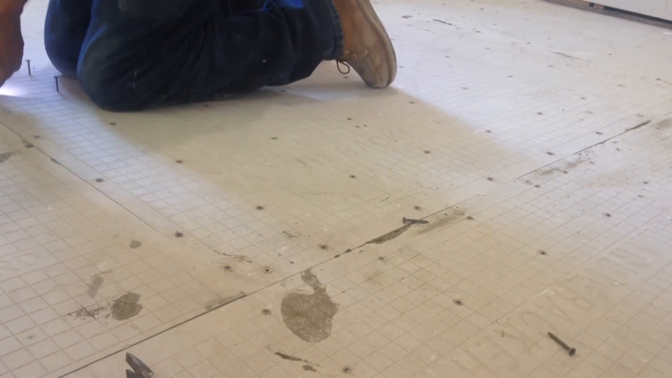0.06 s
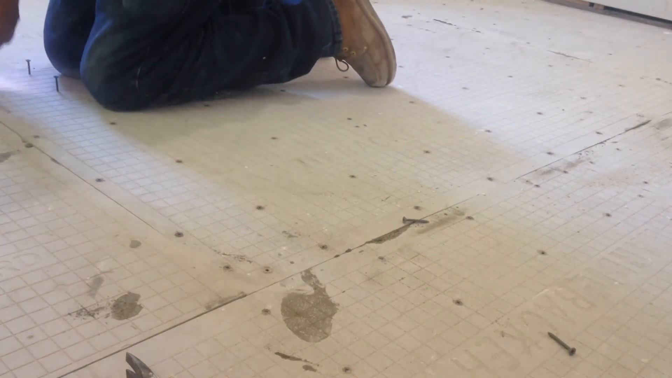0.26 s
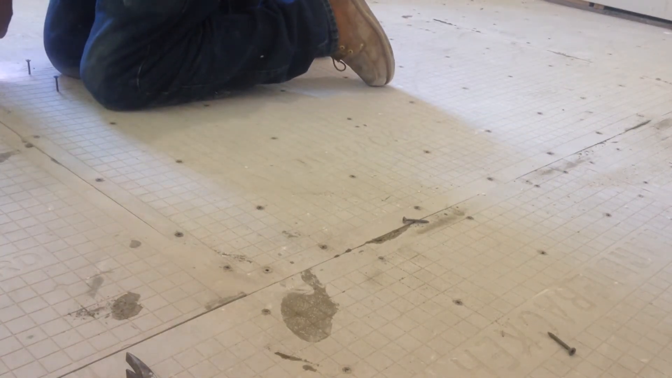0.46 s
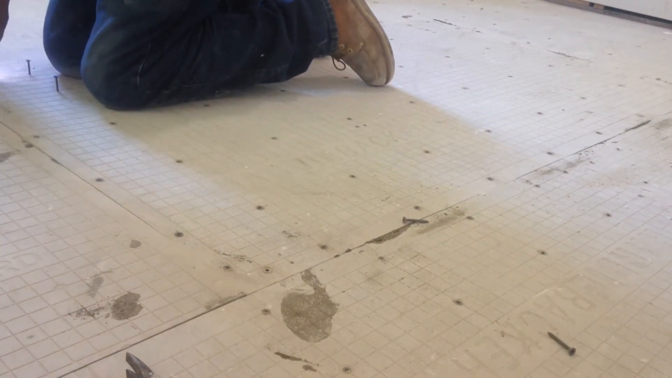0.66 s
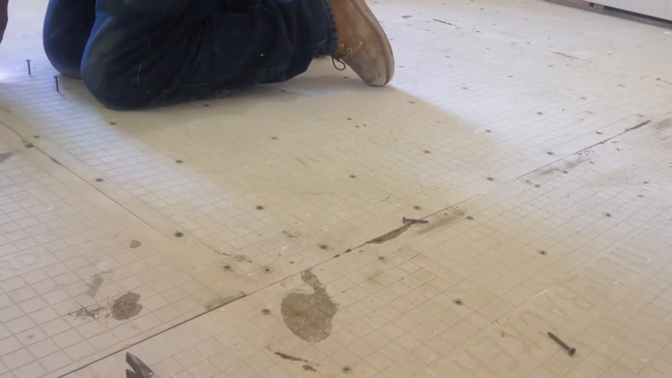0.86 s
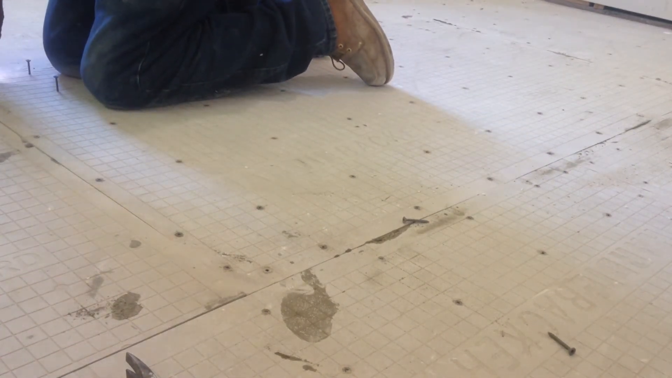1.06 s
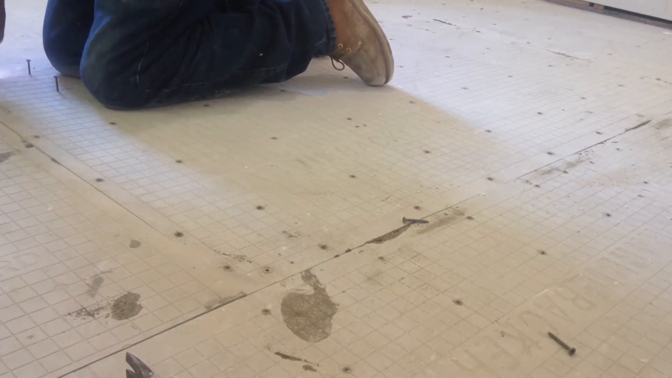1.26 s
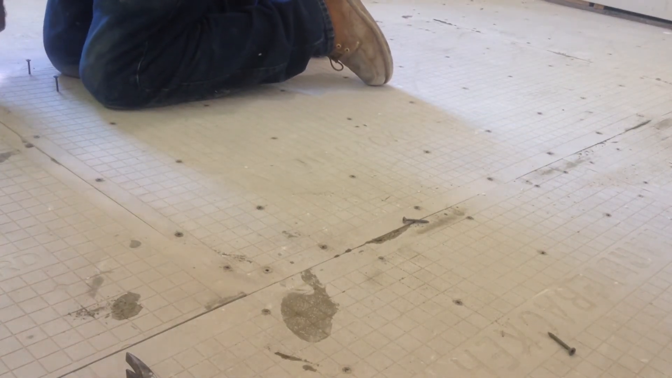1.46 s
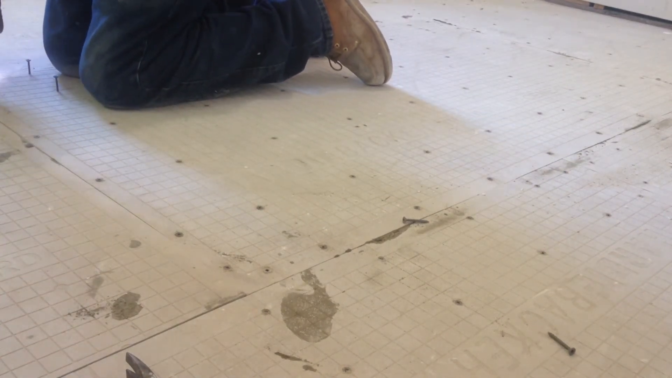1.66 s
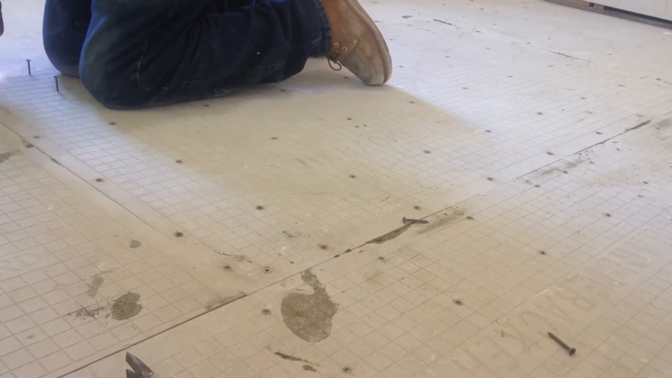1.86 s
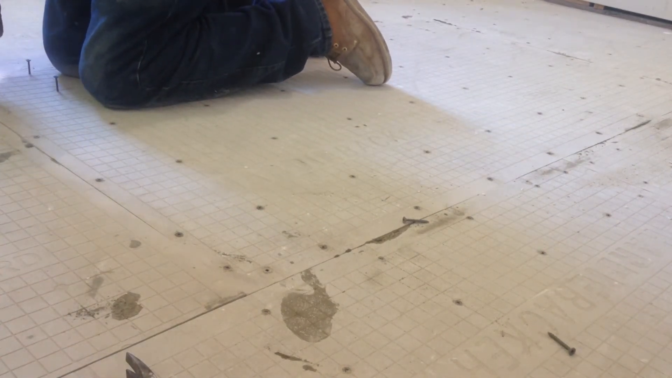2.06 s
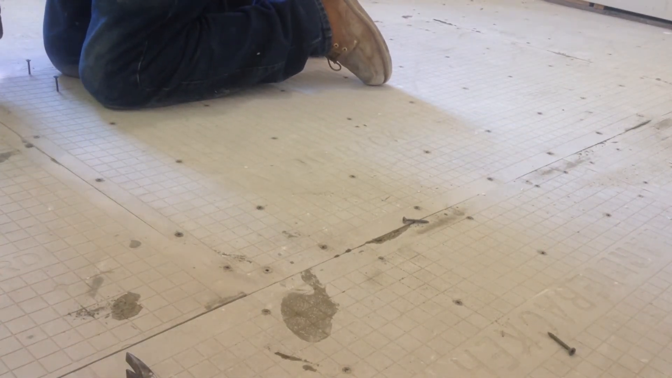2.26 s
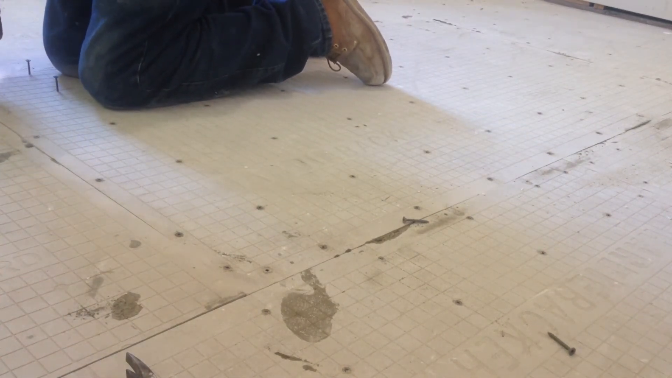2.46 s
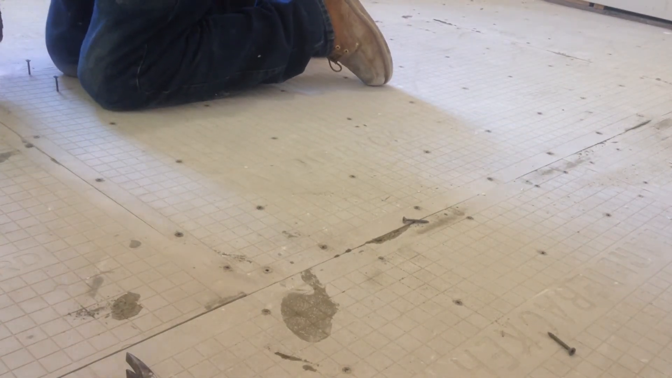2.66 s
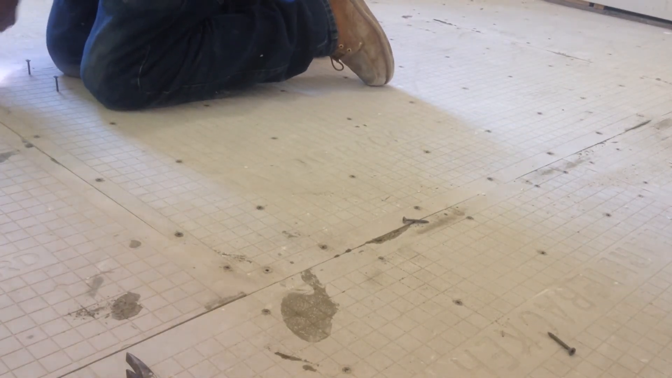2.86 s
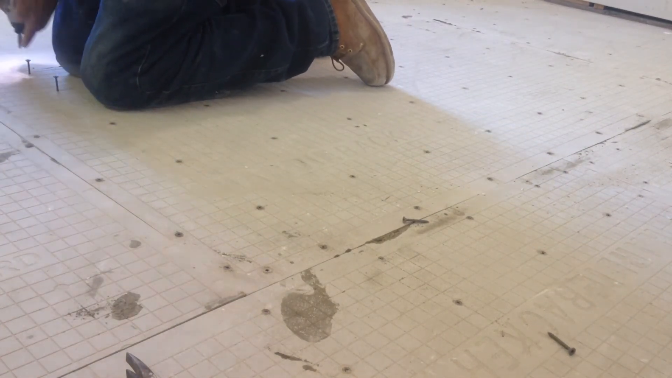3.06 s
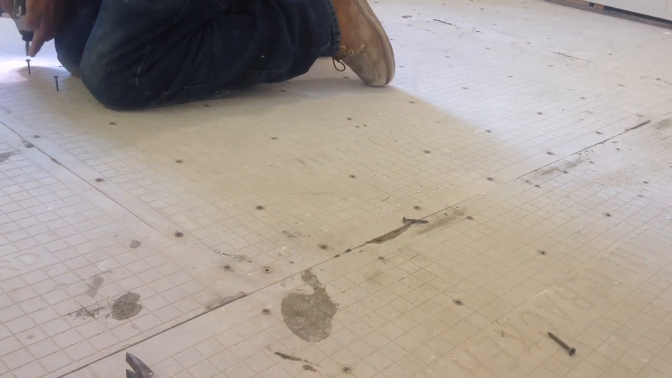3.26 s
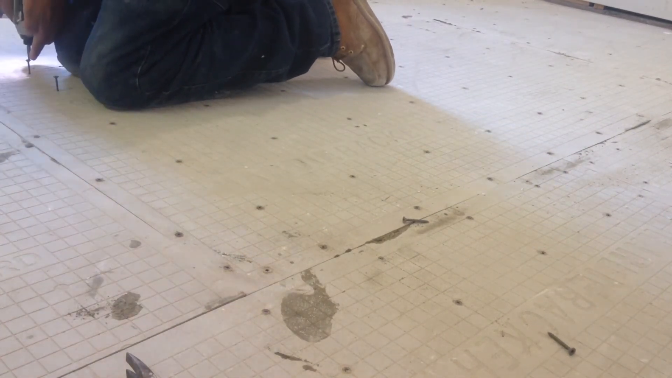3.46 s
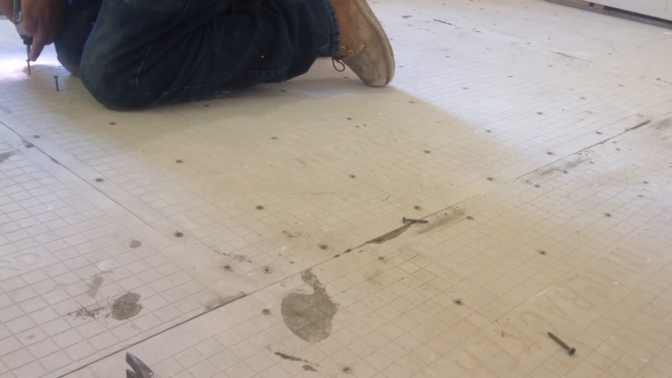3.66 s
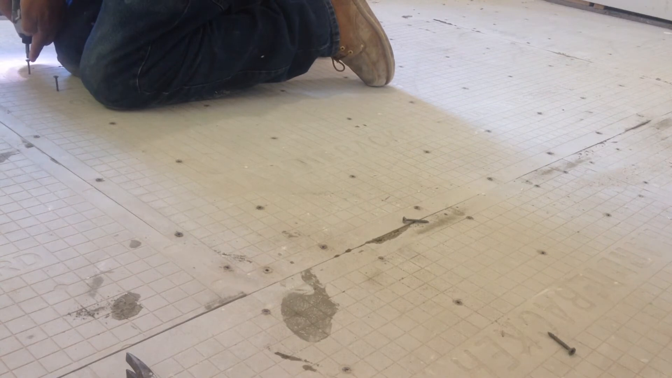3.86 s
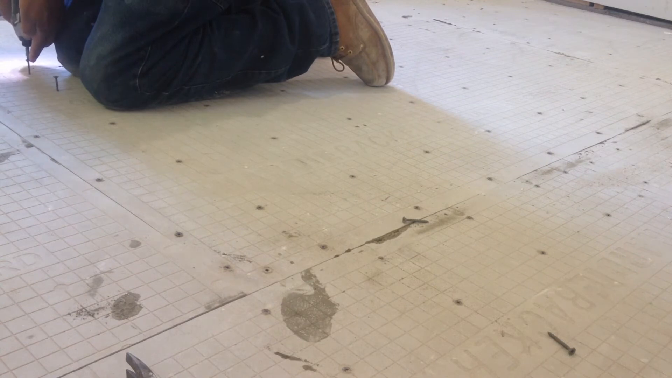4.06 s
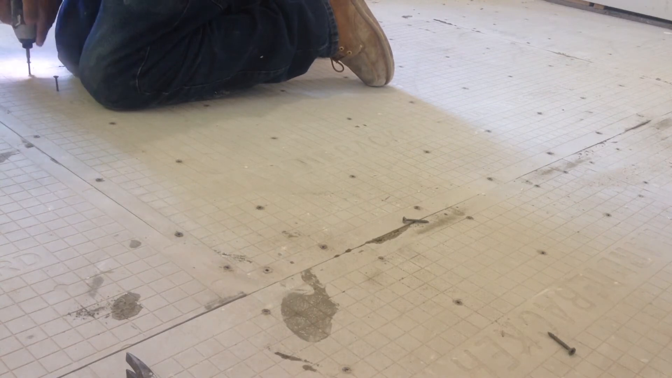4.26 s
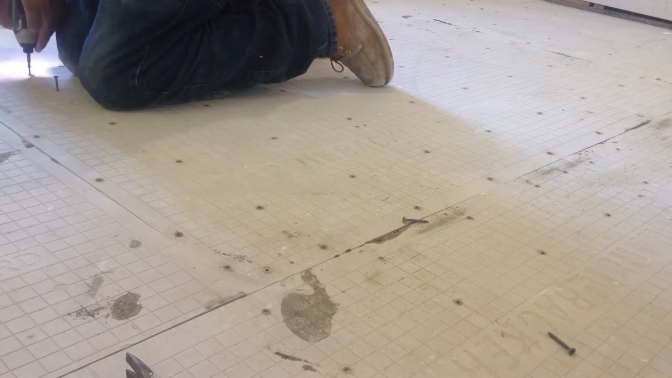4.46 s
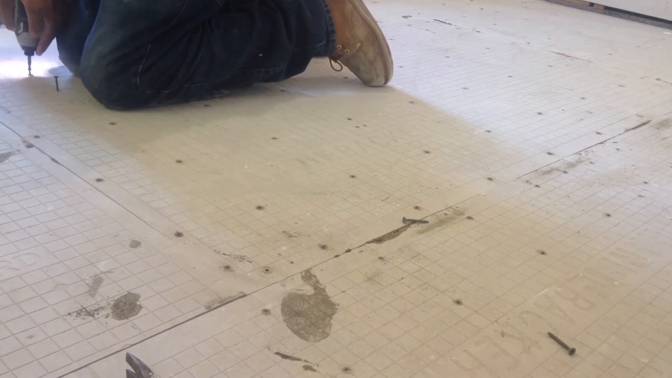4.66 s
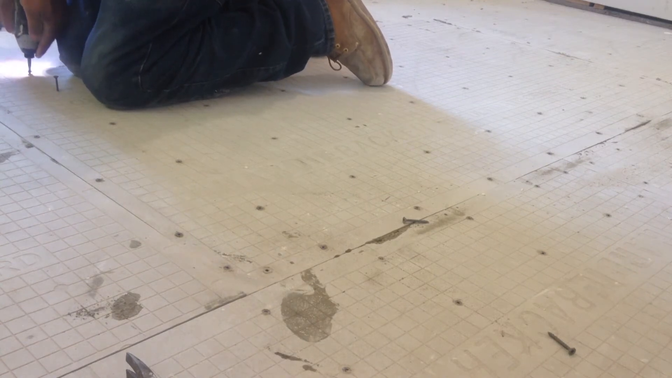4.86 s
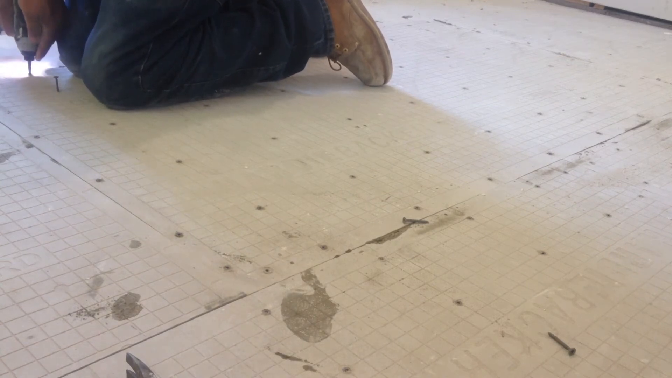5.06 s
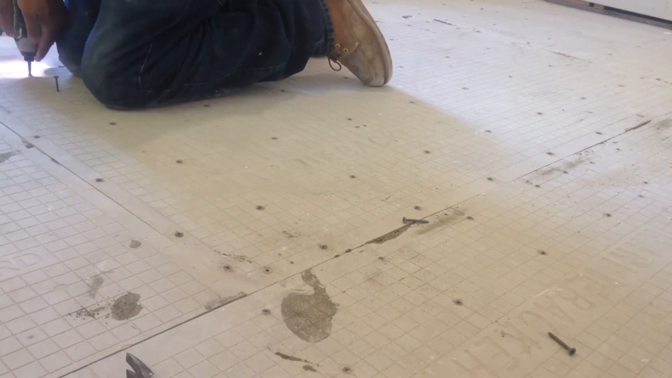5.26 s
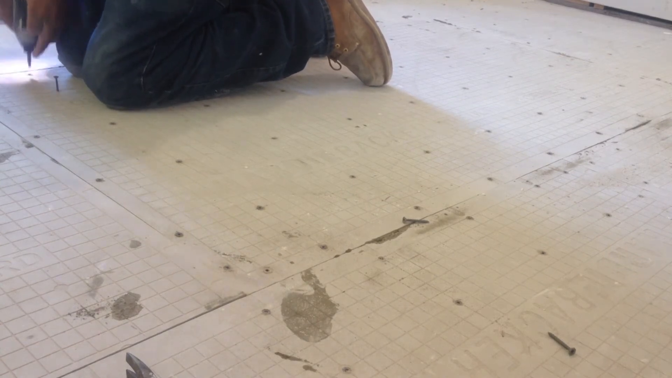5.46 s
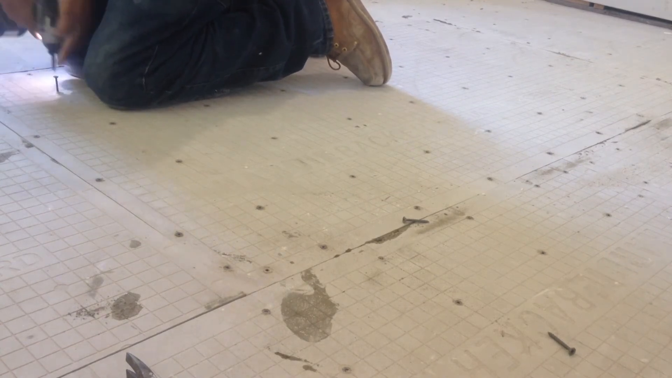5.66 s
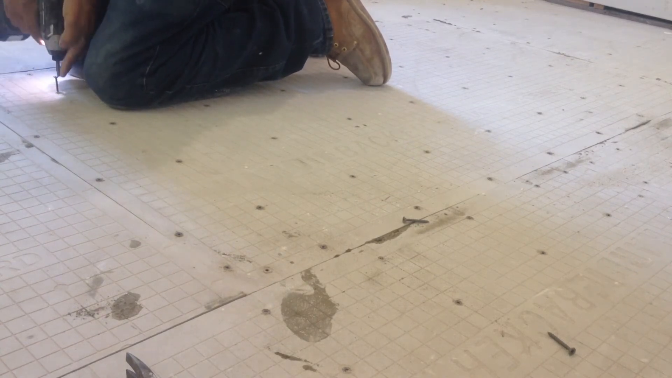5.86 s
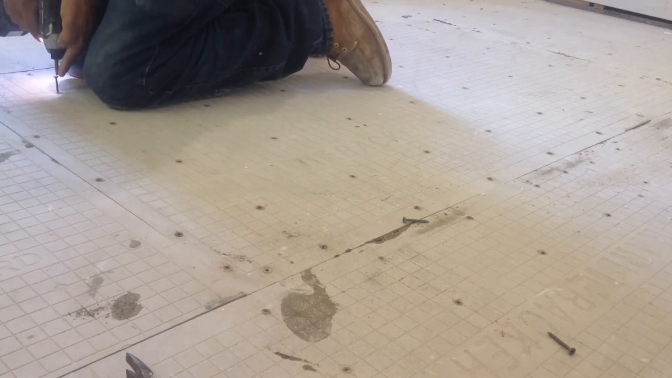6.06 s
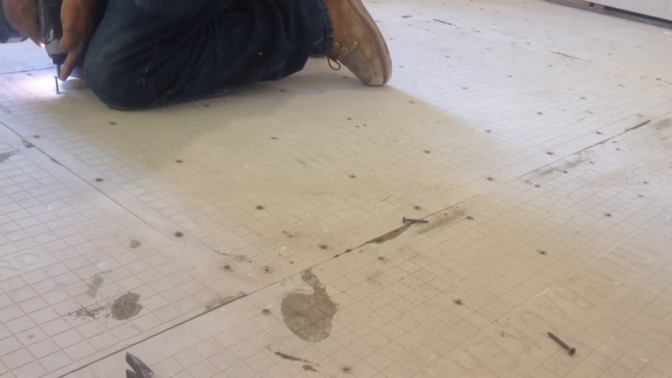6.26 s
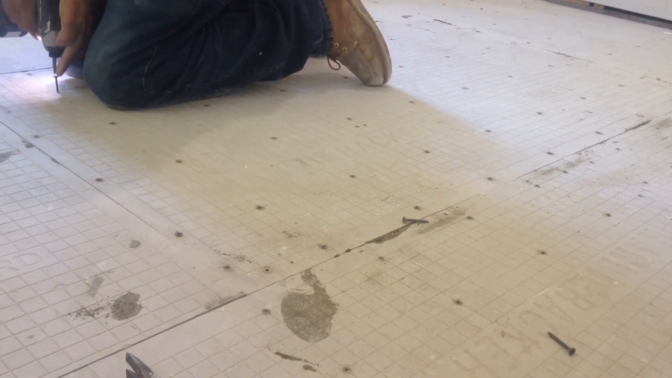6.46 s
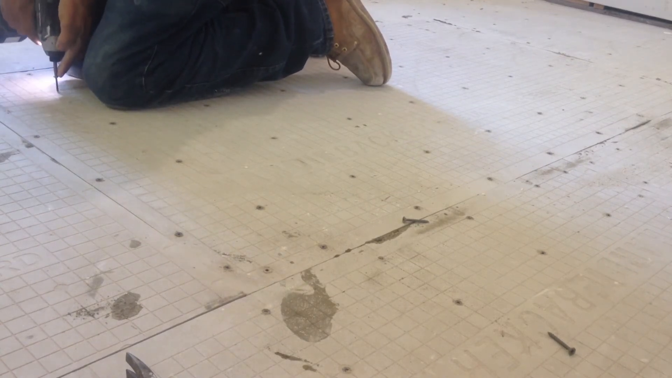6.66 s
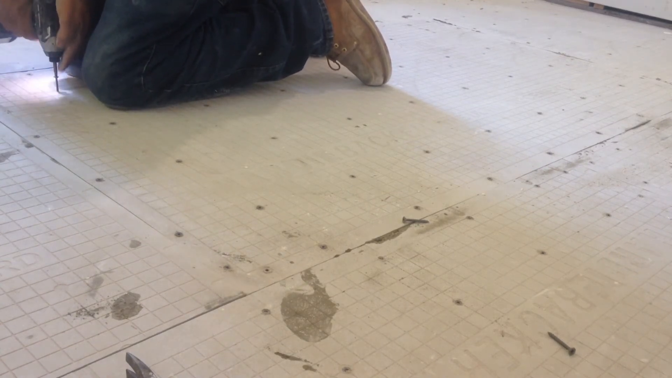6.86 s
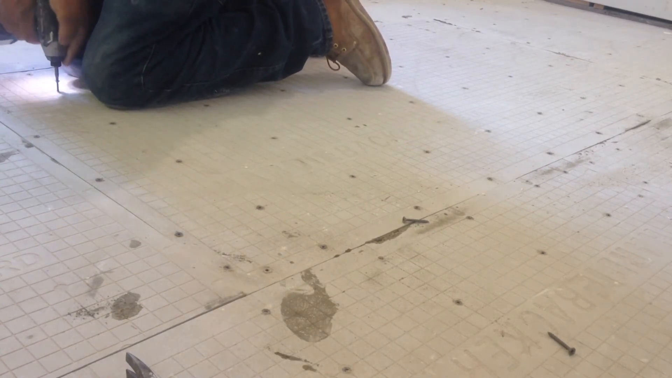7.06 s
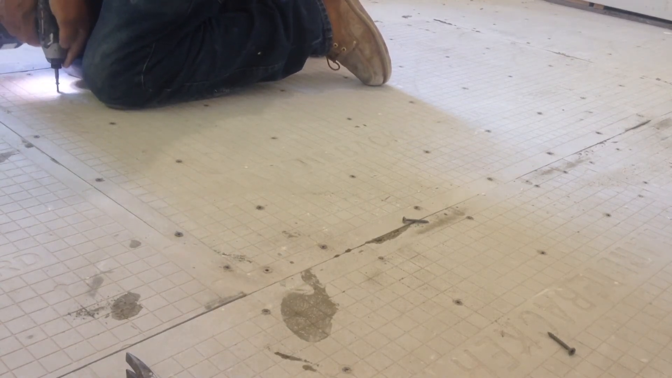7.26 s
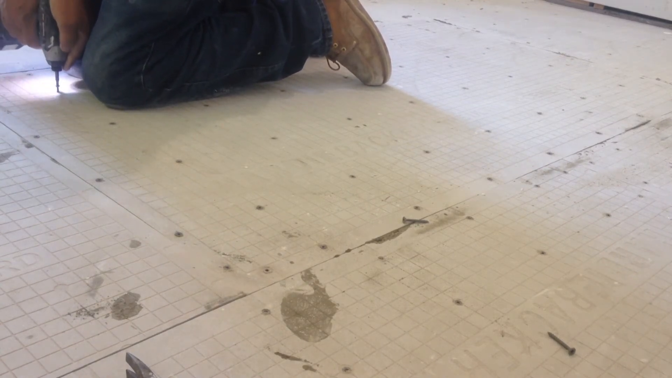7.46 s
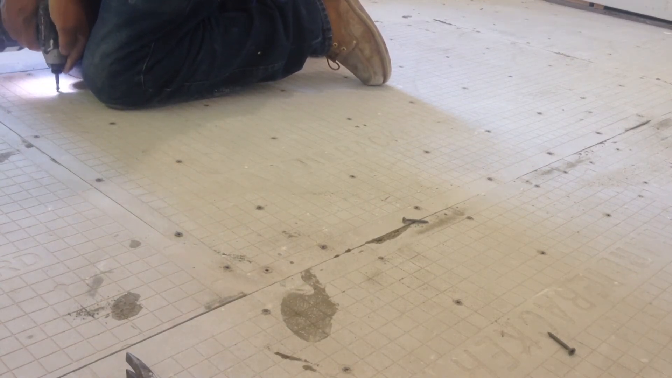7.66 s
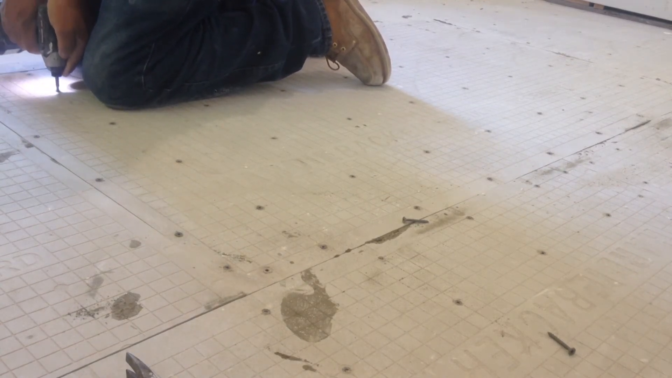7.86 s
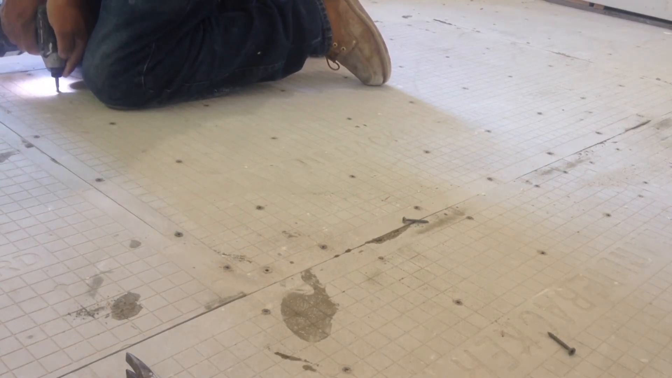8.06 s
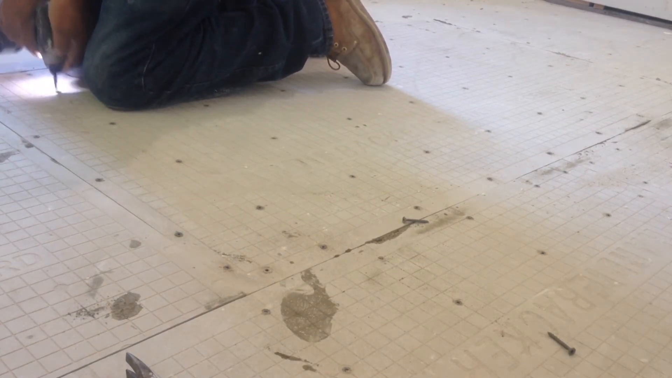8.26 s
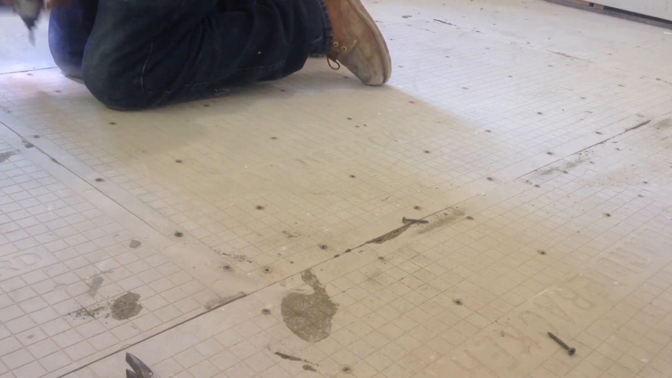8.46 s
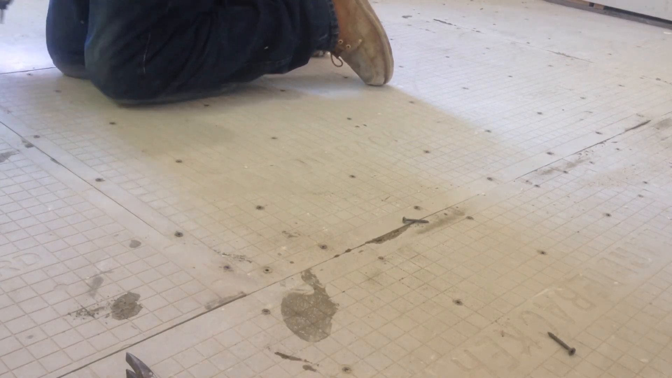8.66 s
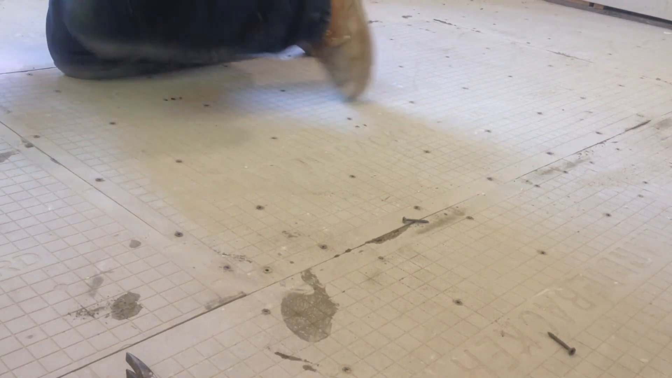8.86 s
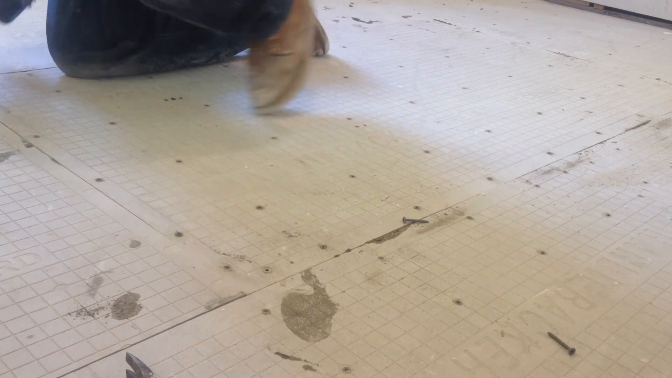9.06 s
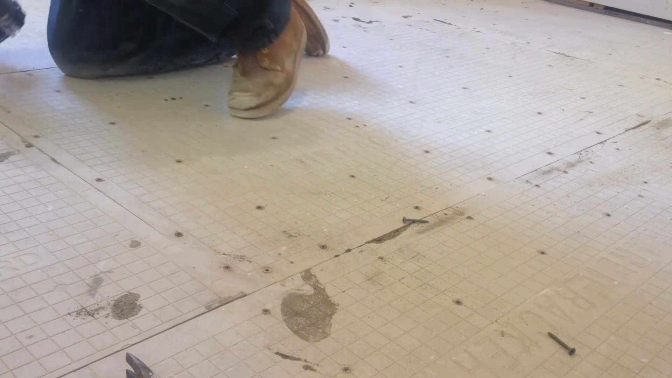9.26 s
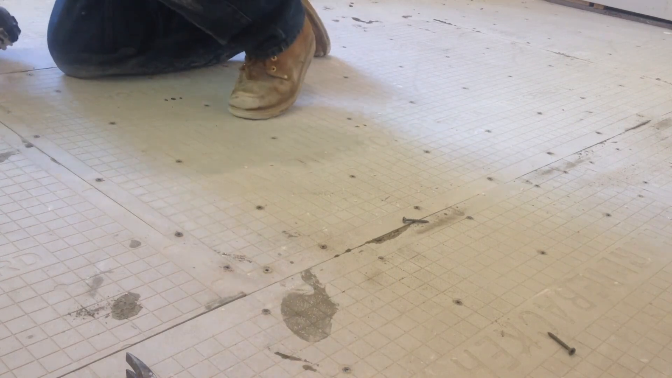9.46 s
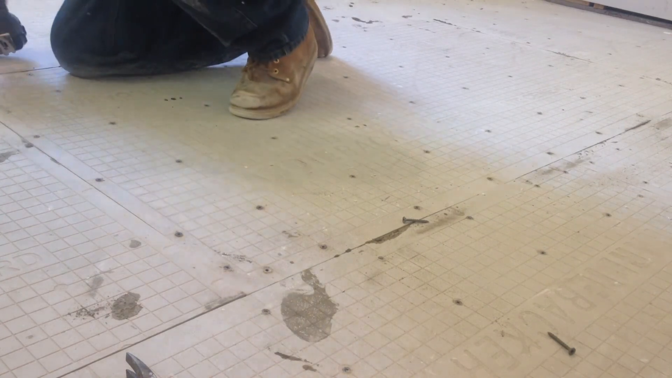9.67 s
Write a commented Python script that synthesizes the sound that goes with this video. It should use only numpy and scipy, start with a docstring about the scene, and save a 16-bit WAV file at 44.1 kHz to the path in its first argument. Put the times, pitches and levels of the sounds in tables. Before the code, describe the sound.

An impact driver hammers three screws into floor sheeting in loud rattling bursts, with taps and thumps between, in a bare echoing room.

```python
"""A cordless impact driver sinks screws into floor sheeting in a bare, echoing room with a low hum.
The last blows on a nearly driven screw fade; bit, screw and trigger then tap and the sheet thumps.
For each of three screws gears whirr, then blows at about 45/s, split into wood and steel forces, ring the board and
tool; as the head seats, the board loses its boom, the blows quicken and harden, and the head grinds.
More taps and thumps fall between screws; at the end a boot shifts in cloth noise and floor rumble."""
import sys
import numpy as np
from scipy import signal
from scipy.fft import rfft, irfft, next_fast_len
from scipy.io import wavfile
from scipy.ndimage import uniform_filter1d, map_coordinates

SR = 44100
rng = np.random.default_rng(int(sys.argv[2]) if len(sys.argv) > 2 else 0)


def file_out(sig):
    """Save sig as 16-bit WAV at sys.argv[1]."""
    # one column per channel
    cols = np.atleast_2d(sig).T
    # limit, then scale
    lim = np.clip(cols, -1, 1)
    pcm = np.round(lim * 32767).astype(np.int16)
    wavfile.write(sys.argv[1], SR, pcm)


N = 428652

# floor thud spectrum [f/Hz, relative density/dB]
THUD_SPECTRUM = [(30, -19), (60, -2), (120, 5), (180, -7.5), (300, -21.5), (800, -60)]
# one row per screw; blows slow as the thread goes deep, then quicken as the head pulls tight
# [bite t/s, deepest t/s, head touch t/s, tight t/s, stop t/s,
#  mid-thread lift/(blows/s), deepest rate/(blows/s), tight rate/(blows/s)]
SCREW_TIMING = [(1.305, 2.157, 2.26, 2.433, 2.735, 3.37, 44.8, 52.2),
                (4.425, 4.96, 5.12, 5.343, 5.455, 1.71, 41.54, 54),
                (7.061, 7.825, 7.945, 8.117, 8.262, 2.6, 41.08, 53.3)]


def amp(db):
    """Decibels to gain."""
    return 10 ** (np.asarray(db) / 20)


def unit(x):
    """Scale to rms 1."""
    return x / np.sqrt(np.mean(x ** 2) + 1e-20)


def along(points, hz):
    """(f/Hz, value) points interpolated on a log frequency axis."""
    f, v = np.transpose(points)
    return np.interp(np.log(hz + 1), np.log(f + 1), v)


def ramp(start_s, end_s):
    """0 before start, 1 after end, one value per sample."""
    return np.clip((np.arange(N) / SR - start_s) / (end_s - start_s), 0, 1)


def wobble(knots_per_s):
    """Smooth random curve through normal-distributed knots."""
    knots = rng.standard_normal(int(N * knots_per_s / SR) + 4)
    return map_coordinates(knots, [np.arange(N) * knots_per_s / SR])


def filtered(x, gain):
    """x times a frequency-dependent gain."""
    m = next_fast_len(N + SR)
    return irfft(rfft(x, m) * gain(np.fft.rfftfreq(m, 1 / SR)), m)[:N]


def noise(spectrum):
    """Coloured noise of rms 1."""
    return unit(filtered(rng.standard_normal(N), lambda hz: amp(along(spectrum, hz))))


def body(force, spectrum, modes=(), size=8192):
    """Ring a force through a causal, minimum-phase response of energy 1: a broad colour lifted at its modes."""
    hz = np.fft.rfftfreq(size, 1 / SR)
    db = along(spectrum, hz)
    for mode_hz, width_hz, lift_db in modes:
        db = db + lift_db / (1 + (2 * (hz - mode_hz) / width_hz) ** 2)
    cepstrum = irfft(np.log(np.maximum(amp(db), 1e-5)))
    # fold the cepstrum to positive time: minimum phase
    cepstrum[1:size // 2] *= 2
    cepstrum[size // 2 + 1:] = 0
    response = irfft(np.exp(rfft(cepstrum)))
    return signal.oaconvolve(force, response / np.linalg.norm(response))[:N]


def contacts(starts, sizes, t60_s, chatter=1, rise_s=0.00061, size=4096):
    """Sharp pushes, each with fresh chatter that swells, dies and takes a share of its energy."""
    t = np.arange(size) / SR
    envelope = amp(-60 * t / t60_s) * (1 - np.exp(-(t / rise_s) ** 2))
    bursts = rng.standard_normal((len(starts), size)) * envelope
    bursts *= np.sqrt(chatter) / np.linalg.norm(bursts, axis=1, keepdims=True)
    bursts[:, 0] += np.sqrt(1 - chatter)
    positions = starts[:, None] + np.arange(size)
    return np.bincount(positions.ravel(), (bursts * sizes[:, None]).ravel(), N)[:N]


def ambience(air_db=-55.5, hum_db=-5.0, waver_db=2.5):
    """Quiet room air plus a low hum of sines, each wavering in level."""
    # room air spectrum [f/Hz, relative density/dB]
    air_spectrum = [(12, -65), (20, -29), (70, -3.5), (109, -8), (342, -27.5), (416, -17.5), (519, -26.5),
                    (705, -28.5), (788, -21.5), (857, -27), (1870, -26.5), (3000, -33.5), (6720, -43),
                    (14300, -46.5), (15500, -45.5)]
    # hum partials [f/Hz, relative level/dB]
    hum_partials = [(91.5, -67.5), (177.6, -67), (269.2, -77), (538.3, -76.5)]
    t = np.arange(N) / SR
    hum = sum(amp(db + waver_db * wobble(12)) * np.sin(2 * np.pi * hz * t) for hz, db in hum_partials)
    return amp(air_db) * noise(air_spectrum) + amp(hum_db) * np.sqrt(2) * hum


def tail():
    """One dense echo of energy 1: noise decaying at a rate set by frequency, fastest in the top treble."""
    # reverberation time [f/Hz, T60/s]
    decay_times = [(80, 0.71), (210, 0.37), (560, 0.66), (1470, 0.66), (3880, 0.62), (7000, 0.61),
                   (14000, 0.33)]
    hz, t, z = signal.stft(rng.standard_normal(SR), SR, nperseg=256)
    fade = amp(-60 * t / along(decay_times, hz)[:, None])
    fade = fade / np.linalg.norm(fade, axis=1, keepdims=True)
    echo = signal.istft(z * fade, SR, nperseg=256)[1]
    return echo / np.linalg.norm(echo)


def paths(size, count):
    """Gates that hand a sound from one echo path to the next, every size samples, at constant power."""
    steps = rng.integers(1, count, N // size + 1)
    path = np.repeat(np.cumsum(steps) % count, size)[:N]
    return [np.sqrt(np.abs(uniform_filter1d((path == k) * 1.0, size // 2))) for k in range(count)]


def room(x, steady_hz=800):
    """Bare walls answer: long waves shift path slowly with the body, short ones quickly as the chuck turns."""
    # echo strength [f/Hz, echo over direct level/dB]
    echo_levels = [(90, -7), (250, -1), (600, 4), (1500, 4), (5000, 5.5), (12000, -1)]

    def wet(hz):
        return amp(along(echo_levels, hz))

    def steady(hz):
        return 1 / (1 + (hz / steady_hz) ** 4)

    direct = filtered(x, lambda hz: 1 / np.hypot(1, wet(hz)))
    low = filtered(direct, lambda hz: wet(hz) * np.sqrt(steady(hz)))
    high = filtered(direct, lambda hz: wet(hz) * np.sqrt(1 - steady(hz)))
    gates = zip(paths(size=16384, count=6), paths(size=1024, count=6))
    echoes = sum(signal.oaconvolve(low * slow + high * fast, tail())[:N] for slow, fast in gates)
    return direct + echoes


def shuffle(grain_db=0.5, rise_s=0.026, fall_s=.07):
    """Trousers rub in small catches while shifting weight rumbles in the floor; each shift swells and dies."""
    # shifts of leg and boot [peak t/s, floor rumble level/dB, cloth level/dB]
    shifts = [(8.84, -54, -57), (8.94, -46.5, -56), (9.02, -50, -67.5), (9.2, -49, -61.5), (9.42, -50, -79)]
    # cloth spectrum [f/Hz, relative density/dB]
    cloth_spectrum = [(150, -9.5), (450, 14), (700, -0.5), (2000, -3), (4500, -1.5), (8000, -6),
                      (15000, -14)]
    peak_s, floor_db, cloth_db = np.transpose(shifts)
    since_s = np.arange(N) / SR - peak_s[:, None]
    swells = np.exp(-np.maximum(-since_s / rise_s, since_s / fall_s))
    rub = unit(noise(cloth_spectrum) * amp(grain_db * wobble(140)))
    rumble = amp(floor_db) @ swells * noise(THUD_SPECTRUM)
    return rumble + amp(cloth_db) @ swells * rub


def thumps():
    """The whole sheet flexes and settles on the floor: chattering pushes rung through the thud response."""
    # weight goes on or comes off the sheet [t/s, level/dB]
    weight_shifts = [(.066, 5), (1.177, -5), (2.698, 1.5), (4.96, 6), (5.411, -1), (6.66, -9), (6.74, -9.5),
                     (8.28, 1.5), (9.53, -9.5)]
    start_s, db = np.transpose(weight_shifts)
    force = contacts((start_s * SR).astype(int), amp(db), t60_s=0.17, chatter=0.91)
    return body(force, THUD_SPECTRUM)


def taps(ring_width_hz=220, ring_db=6):
    """Each onset gives a floor thud, a metal tick and a knock that rings at its own pitch."""
    # onsets in the taps of bit, screw, trigger and boot, and of the bit catching in the screw head;
    # not each is a touch of its own: 6.612 s is a faint lead-in to the tap at 6.628 s
    # [t/s, thud level/dB, knock level/dB, tick level/dB, ring f/Hz]
    onsets = [(0.787, -32, -31, -27, 1500), (0.807, -19, -31, -26, 614), (0.909, -17.5, -17, -25.5, 1050),
              (1.115, -5, -9.5, -2.5, 1930), (1.298, 4.5, 5, -9, 296.6), (3.514, -13, -12, -26, 600),
              (3.617, -35, -31, -48, 630), (3.986, -20.5, -15, -24.5, 1400),
              (4.022, -13.5, -24.5, -25.5, 589), (4.417, -7.5, 9.5, 7.5, 1892),
              (6.154, -14, -11.5, -24, 535), (6.612, -24, -20, -29, 1340), (6.628, -9, -5, -19, 536),
              (6.831, -16, -21, -33, 510), (6.961, -17.5, -12, -3, 1665), (7.052, 2.5, 12.5, -2, 700),
              (9.503, -8.5, -20, -40, 451)]
    # knock spectrum [f/Hz, relative density/dB]
    knock_spectrum = [(100, -26), (250, 1.5), (450, 0.5), (720, -2), (1000, -6.5), (1600, -6.5),
                      (2600, -19.5), (6000, -43)]
    # metal tick spectrum [f/Hz, relative density/dB]
    tick_spectrum = [(800, -52.5), (1600, 0.5), (2800, 5), (5000, -1.5), (8000, -8), (15000, -23.5)]
    start_s, thud_db, knock_db, tick_db, ring_hz = np.transpose(onsets)
    starts = (start_s * SR).astype(int)
    thud = body(contacts(starts, amp(thud_db), t60_s=0.13, chatter=.4), THUD_SPECTRUM)
    tick = body(contacts(starts, amp(tick_db), t60_s=0.04, rise_s=0.00033), tick_spectrum)
    knocks = np.zeros(N)
    for i, hz in enumerate(ring_hz):
        force = contacts(starts[[i]], amp(knock_db[[i]]), t60_s=0.026, chatter=0.17)
        knocks += body(force, knock_spectrum, [(hz, ring_width_hz, ring_db)])
    return thud + tick + knocks


def motor(flutter=.016, gear_db=1.0, whine_db=-5.0, loudness_power=2.6):
    """Gear teeth whine and hiss: louder as the motor spins up, sagging in pitch as the screw starts to load it."""
    # free run-up before each screw bites [trigger t/s, free gear mesh f/Hz, level/dB]
    run_ups = [(1.092, 1476, -35), (4.258, 1385, -33.5), (6.938, 1317, -33)]
    # gear hiss spectrum [f/Hz, relative density/dB]
    gear_spectrum = [(180, -44), (300, -12), (431, -17), (781, -12), (968, -17.5), (1330, 0.5),
                     (1540, -10.5), (2830, -1), (3690, -2.5), (6680, -14.5), (7880, -21), (11500, -21),
                     (15500, -36)]
    # whine harmonics [multiple of mesh frequency, relative level/dB]
    whine_harmonics = [(1, -6), (2, -7), (3, -9), (4, -25), (5, -23.5)]
    spin_up_s, load_s = .016, .035  # speed-gain time constant; how early the screw is felt
    load_sag, load_db = 0.085, 8  # share of speed lost and level gained at the bite
    t = np.arange(N) / SR
    level, mesh_hz = np.zeros(N), np.zeros(N)
    for (trigger_s, free_hz, db), (bite_s, *_) in zip(run_ups, SCREW_TIMING):
        speed = (t < bite_s) * (1 - np.exp(-np.maximum(t - trigger_s, 0) / spin_up_s))
        load = np.exp(np.minimum(t - bite_s, 0) / load_s)
        level += speed ** loudness_power * amp(db + load_db * load)
        mesh_hz += free_hz * speed * (1 - load_sag * load)
    phase = 2 * np.pi * np.cumsum(mesh_hz * (1 + flutter * wobble(150))) / SR
    whine = np.sqrt(2) * sum(amp(db) * np.sin(round(k) * phase) for k, db in whine_harmonics)
    rasp = noise(gear_spectrum) * (1 + 0.11 * np.cos(phase))
    return uniform_filter1d(level, size=200) * (amp(whine_db) * whine + amp(gear_db) * rasp)


def grind(tight_s, hz, db, skirt_db=-20, skirt_octaves=.3, width_s=.07, lead_s=0.028):
    """The head grinds into the board: a narrow noise band swells and fades, peaking just before tight."""
    def band_gain(f):
        return amp(skirt_db * (np.log2((f + 1) / hz) / skirt_octaves) ** 2)

    band = unit(filtered(rng.standard_normal(N), band_gain))
    swell = np.exp(-((np.arange(N) / SR - tight_s + lead_s) / width_s) ** 2)
    return amp(db) * band * swell


def edges(hz, trips_s=(.0019, .0039), bounce=0.55):
    """All-pass sheet echoes: waves run to the edges and back, smearing a push without colouring it."""
    delays = np.exp(-2j * np.pi * np.outer(trips_s, hz))
    return np.prod((delays - bounce) / (1 - bounce * delays), axis=0)


def hammer(on, rate, wood_db, steel_db, jitter_s=.00015, wood_scatter_db=2.0, steel_scatter_db=0.27,
           lead_s=.003, smooth_hz=950):
    """Forces on wood and steel: one blow each time the hammer slips over the anvil."""
    beats = np.flatnonzero(np.diff(np.ceil(np.cumsum(on * rate) / SR), prepend=0))
    late, push, clash, snap = rng.standard_normal((len(beats), 4)).T
    starts = np.abs(beats + jitter_s * SR * late).astype(int)
    grazes = np.maximum(starts - int(lead_s * SR), 0)  # slack taken up just ahead of the blow
    period_gain = np.sqrt(SR / rate[beats])  # a blow carries the energy of a whole period
    wood = period_gain * amp(wood_db[beats] + wood_scatter_db * push)
    steel = period_gain * amp(steel_db[beats] + steel_scatter_db * clash)
    # hard clack inside the rattle of the bit in the screw head
    clack = contacts(starts, steel * amp(-2.5 + 1.6 * snap), t60_s=.005, rise_s=.0006)
    rattle = contacts(grazes, steel * amp(-4), t60_s=.018, rise_s=.006)

    # the slow push repeats from blow to blow; its fast chatter never does
    def repeats(hz):
        return 1 / (1 + (hz / smooth_hz) ** 4)

    shove = filtered(np.bincount(starts, wood, N), lambda hz: np.sqrt(repeats(hz)) * edges(hz))
    chatter = contacts(grazes, wood, t60_s=0.029, rise_s=0.0027)
    chatter = filtered(chatter, lambda hz: np.sqrt(1 - repeats(hz)))
    return shove + chatter, clack + rattle


def finish():
    """Last few blows on a nearly driven screw, fading as the trigger is let go."""
    # nearly driven screw [stop t/s, rate/(blows/s), wood level/dB, steel level/dB, fade/(dB/s)]
    last_blows = (0.06, 46, -15, -20, 51)
    t = np.arange(N) / SR
    stop_s, rate, wood_db, steel_db, fade_db_per_s = last_blows
    fade_db = fade_db_per_s * t
    return hammer(t <= stop_s, np.full(N, rate), wood_db - fade_db, steel_db - fade_db)


def drive(screw, wood_db, steel_db, wood_change_db, steel_change_db, surge_db, fade_db_per_s):
    """One screw: depth and tightening set blow pace and strength; gives wood force, steel force, seating 0-1."""
    bite_rate = 44.25  # blows/s as the hammer engages
    easy_db, unsteady_db = 1.0, -0.5  # mid-thread gain; drift of the hand's pressure
    release_s, release_db = .04, 10  # last blows weaken as the trigger is let go
    bite_db, settle_s = 1, .07  # steel cracks harder until the bit has settled in the screw head
    clamp_s, surge_s = 0.088, .12  # after head touch: to clamp the board; to full blow strength
    wood_fade, steel_surge = 0.91, .55  # wood's share of the fade; steel's share of the surge
    bite_s, deepest_s, touch_s, tight_s, stop_s, lift, deep_rate, tight_rate = screw
    t = np.arange(N) / SR
    depth = ramp(bite_s, deepest_s)
    ease = np.sin(np.pi * depth)  # thread runs most freely half way in
    tightening = np.sin(np.pi / 2 * ramp(deepest_s, tight_s)) ** 2
    rate = bite_rate + (deep_rate - bite_rate) * depth + lift * ease
    rate = rate + (tight_rate - deep_rate) * tightening
    effort = easy_db * ease + unsteady_db * wobble(11) - release_db * ramp(stop_s - release_s, stop_s)
    surge = surge_db * ramp(touch_s, touch_s + surge_s)
    fade = fade_db_per_s * np.maximum(t - tight_s, 0)
    accent = bite_db * np.exp(-np.abs(t - bite_s) / settle_s)
    wood = wood_db + effort + wood_change_db * depth + surge - wood_fade * fade
    steel = steel_db + effort + accent + steel_change_db * depth + steel_surge * surge - fade
    push, clack = hammer((t >= bite_s) & (t <= stop_s), rate, wood, steel)
    return push, clack, ramp(touch_s, touch_s + clamp_s)


def driver(loose_wood_db=-1.0, tight_wood_db=-1.5, tight_steel_db=0.1):
    """Blows travel down each screw into the board, which stiffens as the head pulls it tight."""
    # board while loose, one list per screw [f/Hz, relative density/dB]
    loose_boards = [
        [(21, -47), (35, -13.5), (59, -14.5), (81, -1.5), (136, 1), (194, -5), (247, -25.5), (277, -9),
         (424, -6.5), (594, -14.5), (830, -7), (945, -8), (3000, -11), (3900, -36), (6600, -120)],
        [(21, -45), (35, -14.5), (129, 0.5), (187, -11), (221, 0.5), (252, -12), (352, 0.5), (605, -6.5),
         (664, -8), (728, -6), (1020, -9), (1850, -5.5), (3000, -11.5), (3900, -40), (6600, -120)],
        [(21, -54.5), (35, -22.5), (81, 0.5), (150, -8.5), (213, 0), (243, -19.5), (292, -2.5), (409, -1.5),
         (770, -8), (878, -7), (2190, -8), (2440, -5), (3000, -14), (3900, -47), (6600, -120)],
    ]
    # board once clamped, one list per screw [f/Hz, relative density/dB]
    tight_boards = [
        [(29, -44.5), (50, -30), (172, -11.5), (204, -3.5), (273, -13), (307, -10.5), (384, -7.5), (620, -10),
         (676, -10.5), (844, -1.5), (936, -8.5), (1410, -3.5), (3000, -8.5), (3900, -41.5), (6600, -120)],
        [(29, -56.5), (50, -20.5), (124, -7), (158, 1.5), (242, -9.5), (318, -8), (411, 4), (505, -10.5),
         (642, -4), (749, -7), (874, -3.5), (1000, -5.5), (2060, -3.5), (3000, -6.5), (3900, -39), (6600, -120)],
        [(29, -48.5), (50, -24.5), (124, -9.5), (152, -2.5), (184, 5), (211, -0.5), (238, -5), (318, -8.5),
         (346, -13), (418, 1.5), (569, -8.5), (711, -4.5), (1110, -5), (1730, 2), (3000, -9.5), (3900, -37),
         (6600, -120)],
    ]
    # board under the nearly driven screw [f/Hz, relative density/dB]
    home_board = [(30, -38.5), (60, -18), (110, -11), (175, -5), (255, -16.5), (500, -10), (660, -6.5),
                  (820, -2), (1100, -8), (1300, -5), (2200, -9), (4000, -38.5)]
    # ring of the clamped floor [f/Hz, width/Hz, lift/dB]
    floor_modes = [(205, 27, 2), (318, 81, 9), (623.4, 36, 8.5), (698, 50, 5.5), (881, 24, 6),
                   (1301, 76, 4.5), (1700, 230, -0.5), (2600, 280, -3)]
    # hammer, anvil and bit, screw loose [f/Hz, relative density/dB]
    loose_steel = [(1530, -21), (2600, -7.5), (2840, -1), (3950, 0.5), (6180, -2), (8400, -9.5),
                   (10700, -11), (13700, -18.5), (15500, -22.5)]
    # hammer, anvil and bit, screw tight [f/Hz, relative density/dB]
    tight_steel = [(1530, -27), (2600, -6.5), (2910, -4.5), (4130, -3), (5780, -6.5), (8590, -14.5),
                   (13100, -21), (15500, -27.5)]
    # how hard each screw is hit [wood level/dB, steel level/dB, wood change along thread/dB,
    #  steel change along thread/dB, surge on tightening/dB, fade once tight/(dB/s),
    #  head grind f/Hz, head grind level/dB]
    efforts = [(-19, -21.5, -2, -3, 6.5, 14, 2100, -25), (-18, -19, -2.5, -3.5, 3.5, 27, 1850, -23),
               (-23.5, -25, 4, 3, 3.5, 7.5, 2680, -17.5)]
    push, tight_clack = finish()
    wood, loose_clack = body(push, home_board, floor_modes), np.zeros(N)
    for screw, row, loose, tight in zip(SCREW_TIMING, efforts, loose_boards, tight_boards):
        *effort, grind_hz, grind_db = row
        push, clack, seated = drive(screw, *effort)
        free, held = np.sqrt(1 - seated), np.sqrt(seated)  # constant-power crossfade
        wood += amp(loose_wood_db) * body(push * free, loose)
        wood += amp(tight_wood_db) * body(push * held, tight, floor_modes)
        wood += grind(screw[3], grind_hz, grind_db)
        loose_clack += clack * free
        tight_clack += clack * held
    steel = body(loose_clack, loose_steel) + amp(tight_steel_db) * body(tight_clack, tight_steel)
    return wood + steel


def scene():
    """Tool and worker in the room, over its air and hum."""
    sources = driver() + motor() + taps() + thumps() + shuffle()
    return (room(sources) + ambience())[None]


def record(dry, dip_hz=2920, dip_width_hz=300, dip_db=-5.0, ceiling=.78, top_hz=15500):
    """Cut a narrow dip, round off the highest peaks and stop at the band limit."""
    def dip_gain(hz):
        return amp(dip_db / (1 + (2 * (hz - dip_hz) / dip_width_hz) ** 2))

    dipped = filtered(dry[0], dip_gain)
    rounded = dipped / (1 + (dipped / ceiling) ** 4) ** (1 / 4)
    return filtered(rounded, lambda hz: hz < top_hz)[None]


dry = scene()
out = record(dry)
file_out(out)
```